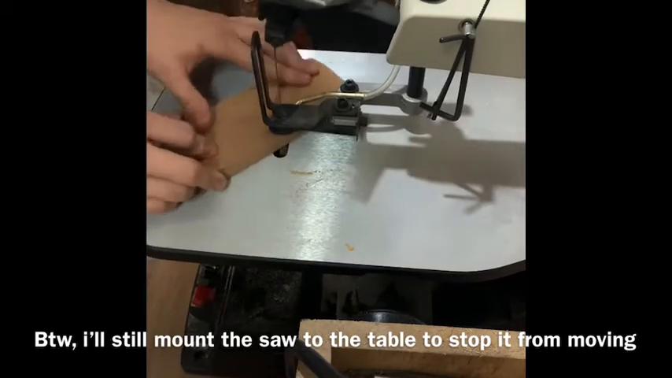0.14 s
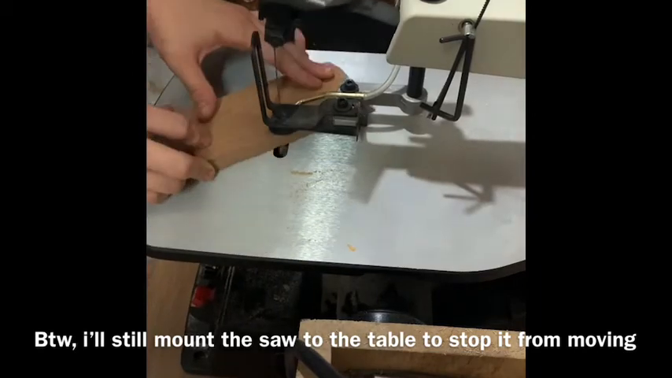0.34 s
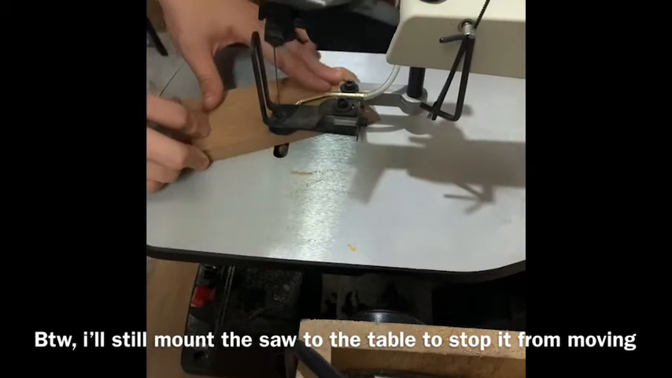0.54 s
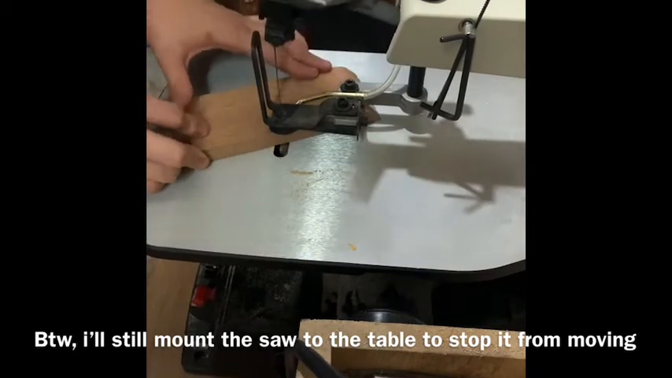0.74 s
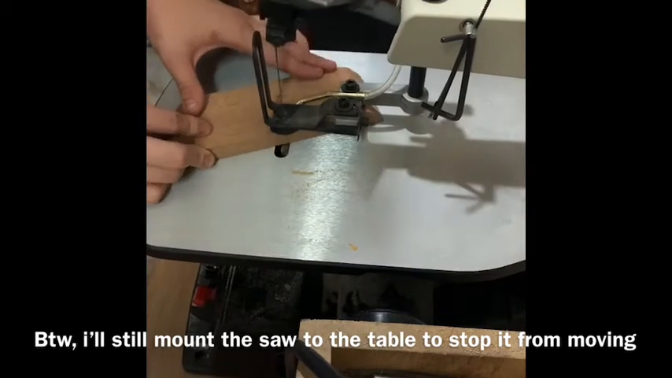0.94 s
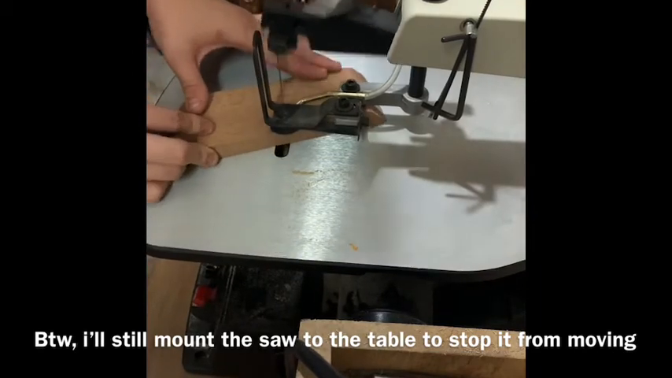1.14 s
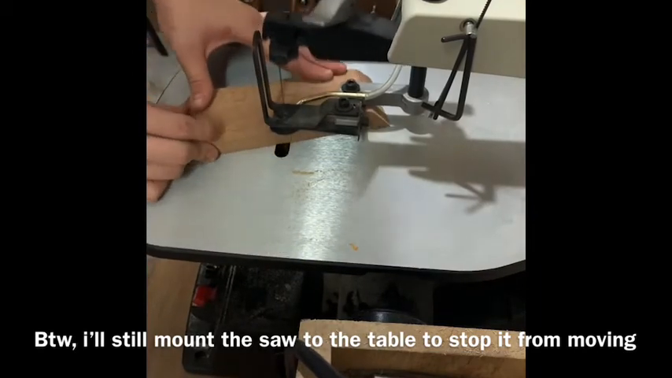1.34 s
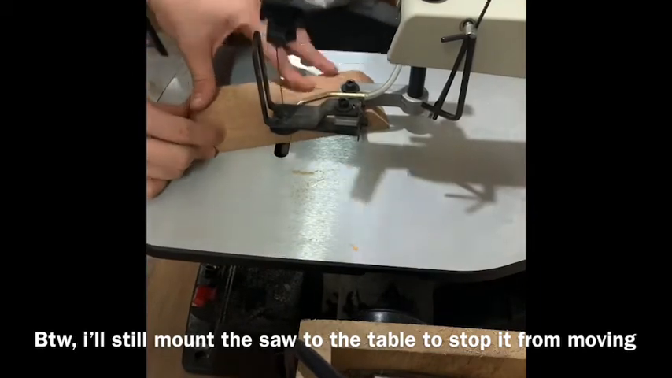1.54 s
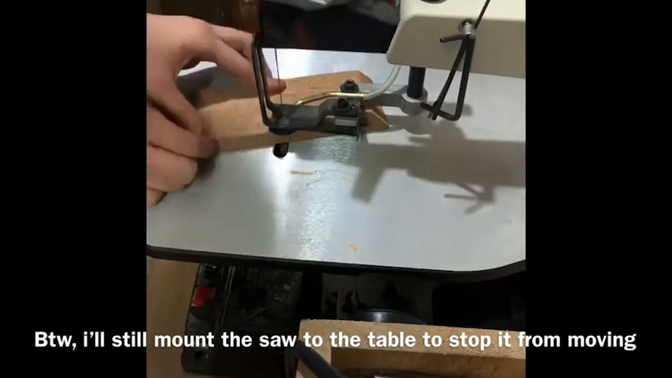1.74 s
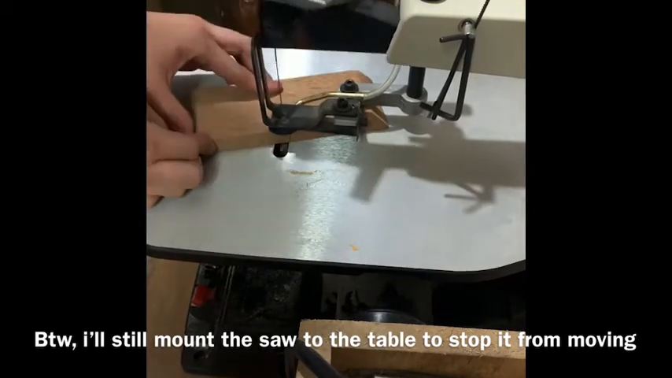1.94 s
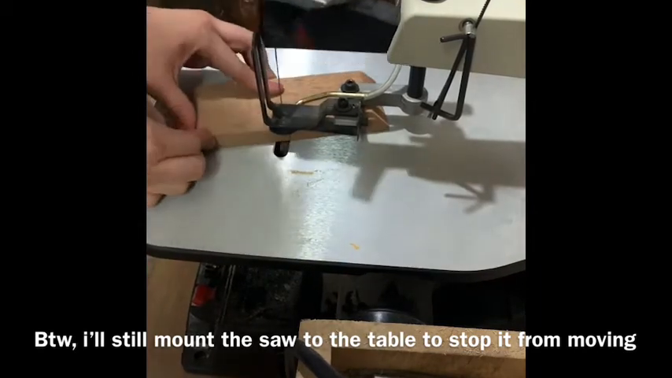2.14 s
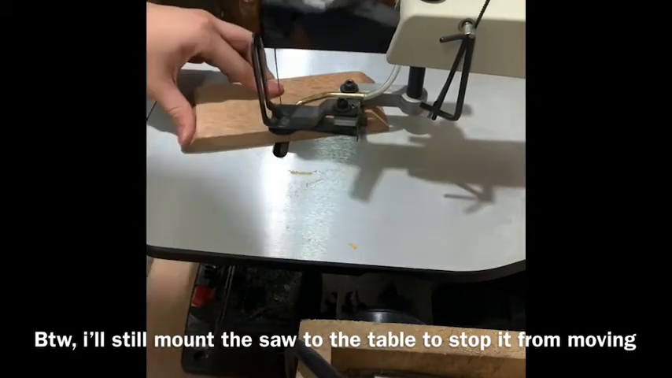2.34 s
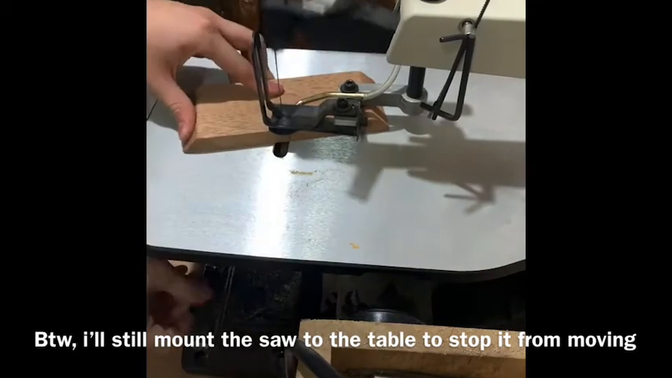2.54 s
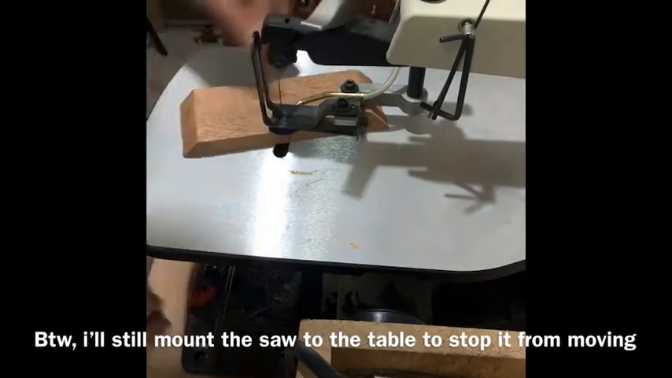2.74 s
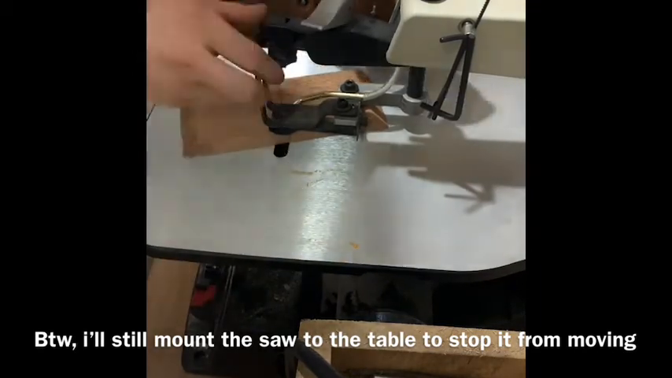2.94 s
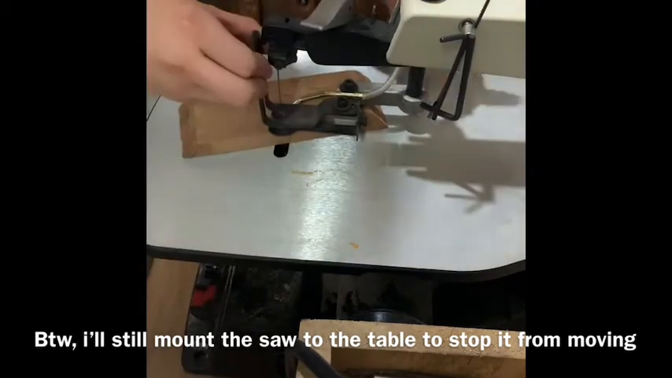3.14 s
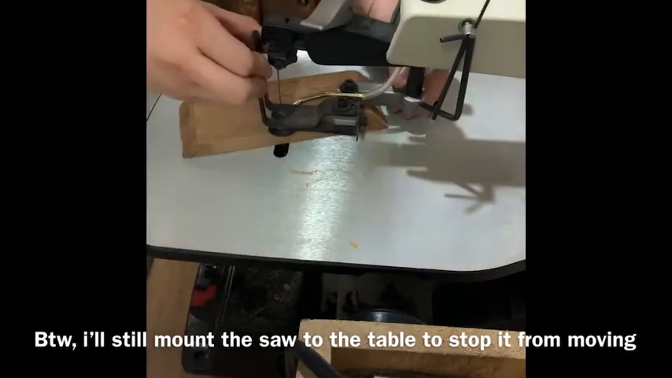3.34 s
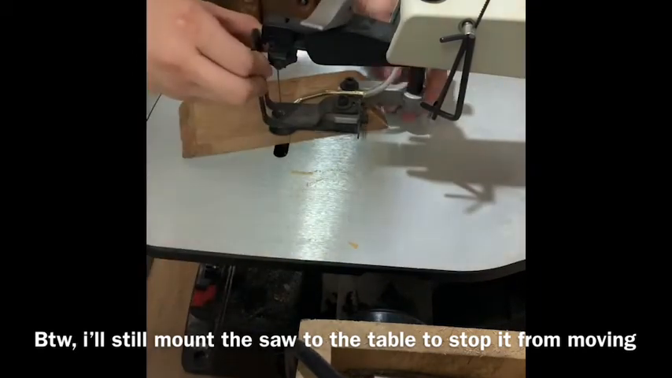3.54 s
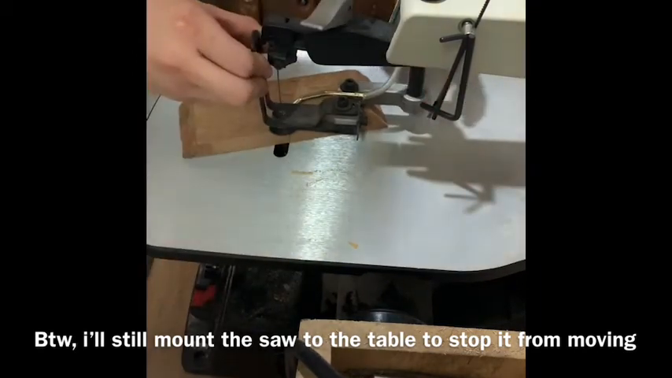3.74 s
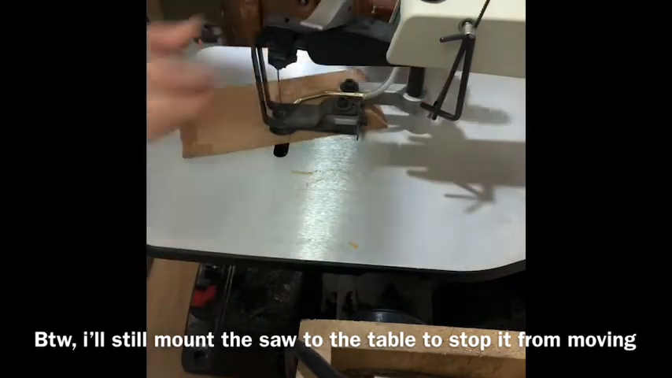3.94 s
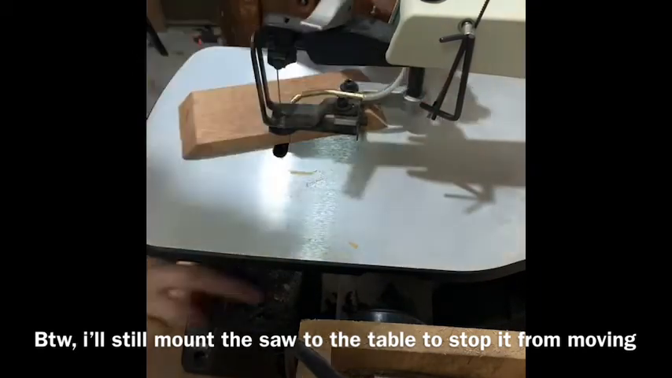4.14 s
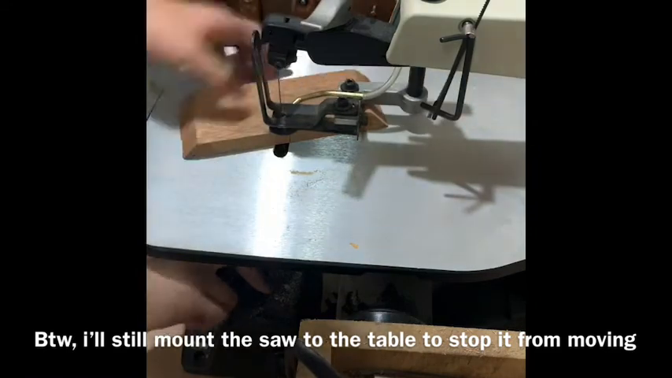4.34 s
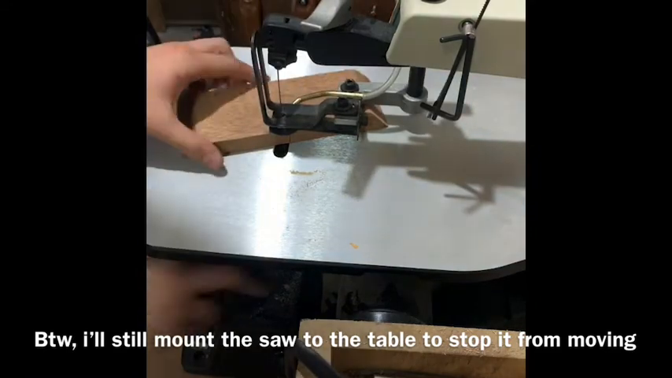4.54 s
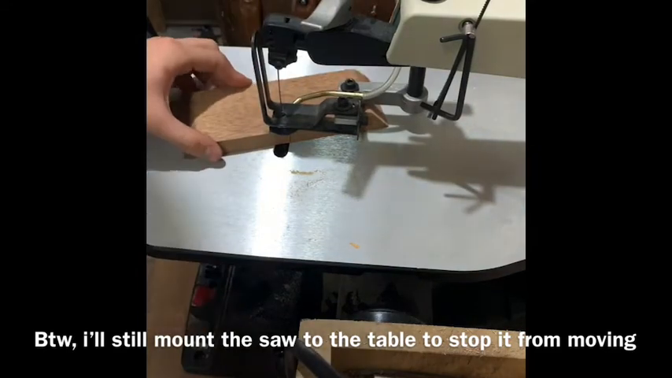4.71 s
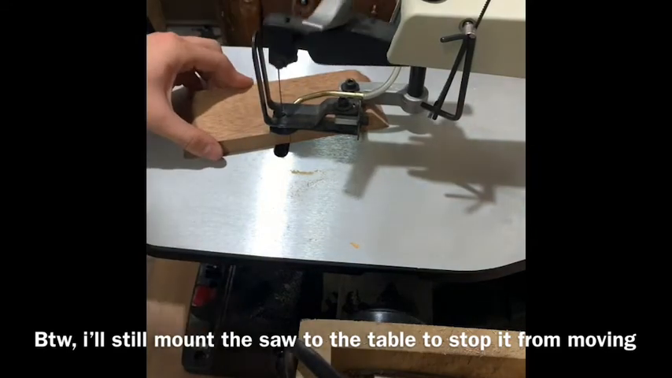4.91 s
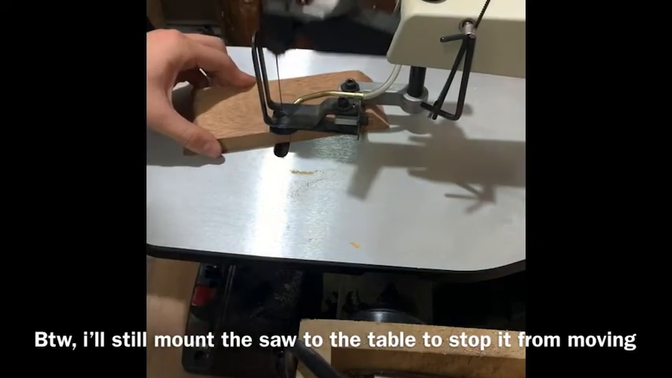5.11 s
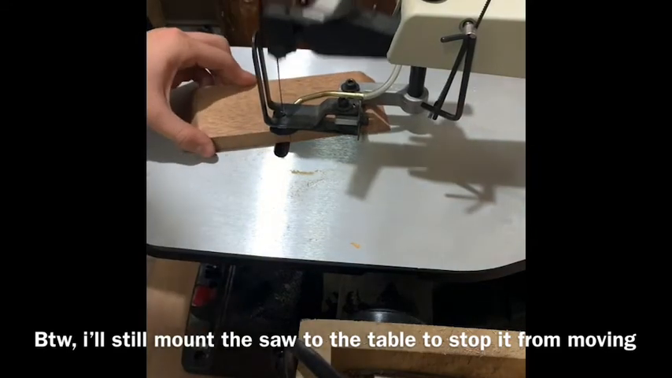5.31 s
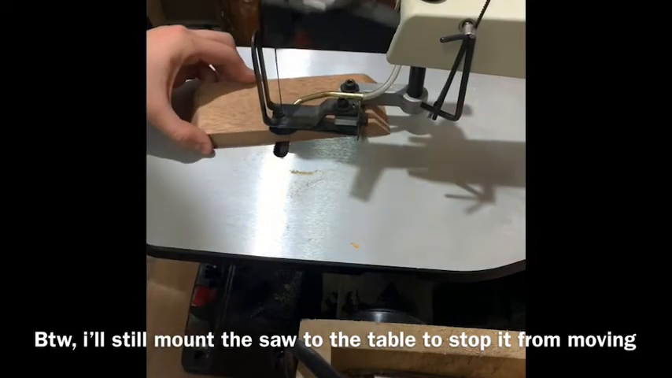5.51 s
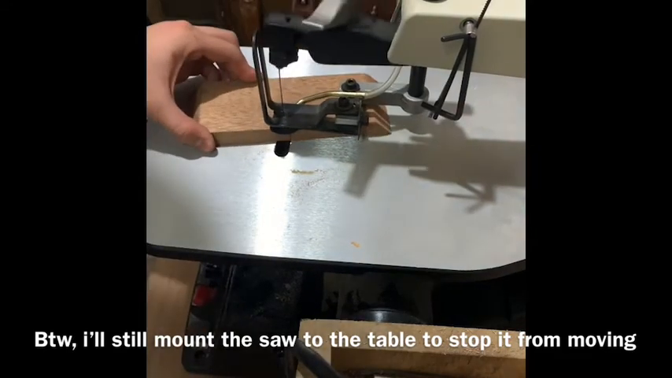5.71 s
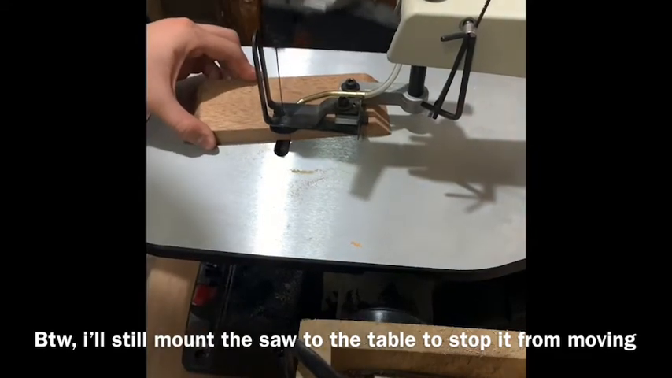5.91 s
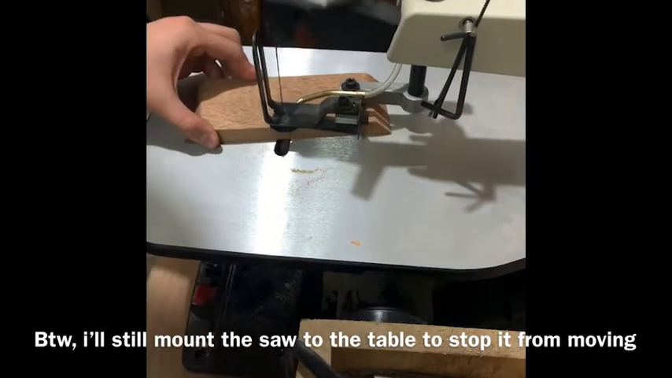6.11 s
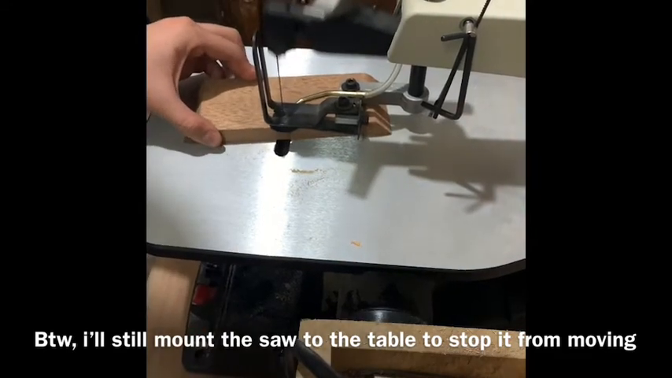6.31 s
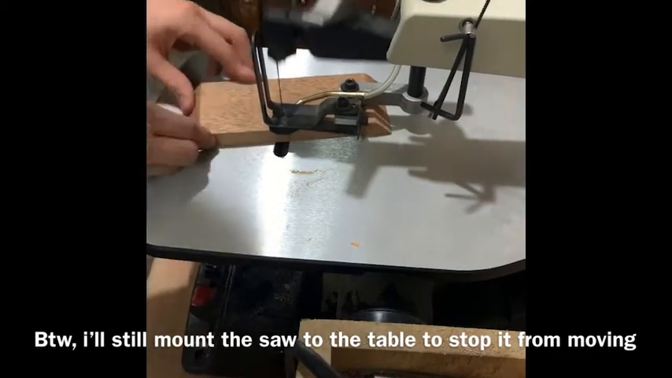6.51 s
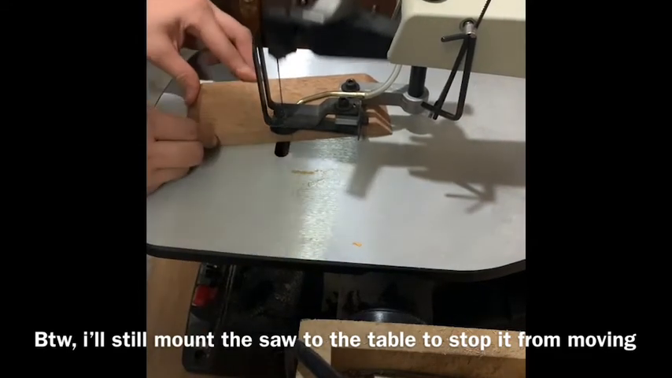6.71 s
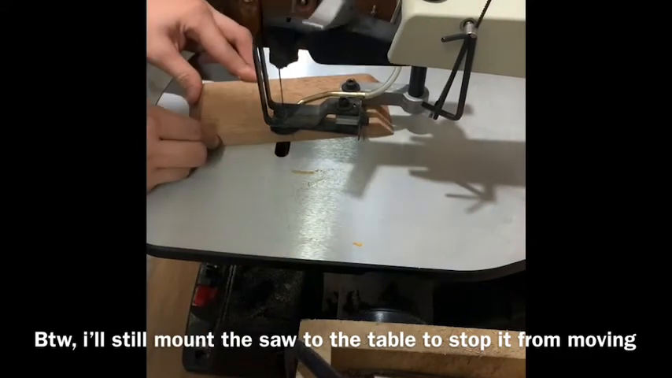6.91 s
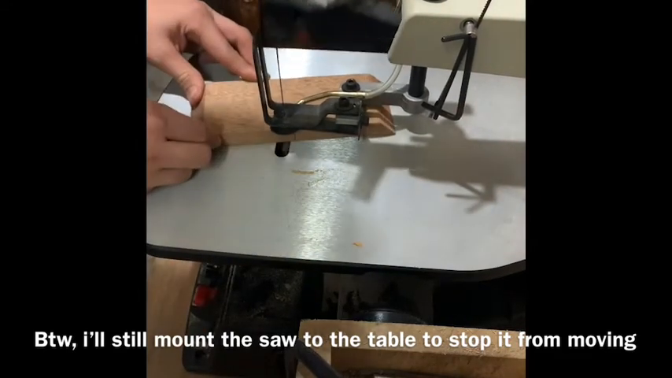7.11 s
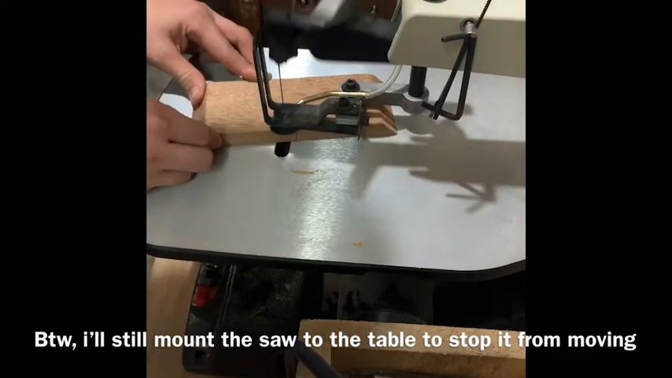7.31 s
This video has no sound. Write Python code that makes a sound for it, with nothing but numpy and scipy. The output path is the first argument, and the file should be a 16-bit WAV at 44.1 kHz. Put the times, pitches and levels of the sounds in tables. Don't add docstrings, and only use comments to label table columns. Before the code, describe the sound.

Close up in a small workshop, a scroll saw buzzes while its teeth rasp a board about thirteen times a second. It snaps off almost instantly. Over faint ventilation hum, fingers tick on a metal clamp and hands bump and drag on the table. A second switch snap, and the saw restarts, building to sharp, sizzling bites.

```python
import sys
import numpy as np
from scipy import signal
from scipy.fft import rfft, irfft, next_fast_len
from scipy.io import wavfile
from scipy.ndimage import uniform_filter1d

SR = 44100
rng = np.random.default_rng(int(sys.argv[2]) if len(sys.argv) > 2 else 0)


def invert_db(level):
    return 10 ** (np.asarray(level, dtype=float) / 20)


def digitize_waveform(pressure):
    field = np.atleast_2d(pressure).T
    bounded = np.clip(field, -1, 1)
    quanta = np.round(bounded * 32767).astype(np.int16)
    wavfile.write(sys.argv[1], SR, quanta)


N = 324576
SIZE = next_fast_len(N + SR)
HZ = np.maximum(np.arange(SIZE // 2 + 1) * SR / SIZE, 1)
T = np.arange(N) / SR
MAINS_BUZZ_HZ = 120
OFF_S, ON_S, COAST_S = 2.62, 4.732, 0.011

# frequency in Hz, level in dB per Hz
RASP_COLOUR = [(110, -42), (300, -3), (600, -13.5), (1400, -10.5), (2500, -14.5), (4000, -11),
               (6500, -20.5), (8300, -8.5), (9100, -16), (10500, -8), (11500, -27)]
# frequency in Hz, level in dB per Hz
SIZZLE_COLOUR = [(9800, -42), (10800, -0.5), (12800, -5), (14500, -7), (15300, 1), (15600, -9),
                 (15850, -28), (16300, -32)]
# time in seconds, position in turns
CRANK = [(0.0, -0.48), (0.556, 7), (0.8445, 11), (1.0527, 14), (1.4365, 19), (1.642, 22), (1.911, 26),
         (2.2523, 31), (2.6, 36.13), (4.74, 0.35), (5.022, 3), (5.262, 6), (5.5674, 10), (5.8658, 14),
         (6.2253, 19), (6.5728, 24), (6.8376, 27), (7.36, 33.68)]
# time in seconds, feed pressure in dB, long edge free in dB,
# short edge free in dB, board turned in dB
FEED = [
    [(0.0, 2.5, -20, -14, -5.5), (0.7, -1.5, -22, -24, -6), (0.85, 0, -12, -12, -4),
     (1.15, 4, -5, -3.5, -11), (1.44, 2.5, -28, -3, -2.5), (1.65, 3, -27, -4.5, 0), (1.95, 0, -29, -5, -4),
     (2.4, 4.5, -25, -12, 3), (2.6, 2.5, -25, -4, -0.5)],
    [(4.74, -11, -8, -15, -6), (4.95, -2, -18, -22, -9.5), (5.2, 3.5, -7, -10, -8.5),
     (5.65, -0.5, -1, -13, -8), (5.8, 3, -7, -20, -4.5), (6.23, 4, -12, -23, -0.5), (6.32, 1, 3.5, -18, -2),
     (6.6, 2, 4, -15, 2.5), (7.36, 4, -6, -9, 1.5)],
]


def rms_one(x):
    return x / np.sqrt(np.mean(x ** 2) + 1e-20)


def at_hz(points):
    hz, values = np.array(points).T
    return np.interp(np.log(HZ), np.log(hz), values)


def in_time(spans):
    s, *columns = np.transpose(np.vstack(spans))
    return [np.interp(T, s, c) for c in columns]


def shaped(x, response):
    return irfft(rfft(x, SIZE) * response, SIZE)[..., :N]


def butter(x, order, hz, kind="low"):
    return signal.sosfilt(signal.butter(order, hz, kind, fs=SR, output="sos"), x)


def drift(per_s):
    return rms_one(shaped(rng.standard_normal(N), 1 / (1 + (HZ / per_s) ** 2)))


def resonances(x, modes, patchy_db=0):
    out, power = 0, 0
    for k, (hz, width_hz, db) in enumerate(modes):
        r = np.exp(-np.pi * width_hz / SR)
        a = [1, -2 * r * np.cos(2 * np.pi * hz / SR), r * r]
        b = [(1 - r * r) / 2, 0, (r * r - 1) / 2]
        fed = x * invert_db(patchy_db * drift(38)) if patchy_db else x
        out = out + (-1) ** k * invert_db(db) * signal.lfilter(b, a, fed + 1e-18)
        power += invert_db(2 * db) * np.pi * width_hz / SR
    return out / np.sqrt(power)


def grains(per_s, spread_db):
    sizes = invert_db(spread_db * np.minimum(rng.exponential(1, N), 5)) * rng.choice([-1, 1], N)
    return rms_one(sizes * (rng.random(N) < per_s / SR))


def bursts(times, levels_db, hold_ms, rise_ms, fall_ms):
    out = np.zeros(N + SR)
    t_ms = np.arange(SR // 8) / SR * 1000
    for s, db, hold in np.broadcast(times, levels_db, hold_ms):
        rise = 1 - np.exp(-t_ms / rise_ms)
        fall = np.exp(-0.4 * t_ms / max(hold, 0.1) - np.maximum(t_ms - hold, 0) / fall_ms)
        out[round(s * SR):][:len(t_ms)] += invert_db(db) * rise * fall
    return out[:N]


def workshop_hum():
    # frequency in Hz, level in dB per Hz
    common_colour = [(15, -55), (40, -29), (74, -13.5), (128, -10), (145, 1), (165, -6.5), (294, -11),
                     (346, -4.5), (396, -14), (491, -8.5), (718, -9), (2490, -23.5), (8670, -36),
                     (9400, -42), (10800, -34.5), (15300, -40), (15900, -60)]
    # frequency in Hz, level in dB per Hz
    apart_colour = [(15, -45), (170, -26), (310, -17), (336, -16), (385, -10), (505, -15), (941, -8.5),
                    (1340, -6.5), (10800, -26.5), (13000, -34), (16200, -41)]
    # frequency in Hz, level in dB
    whine_tones = [(1136, -49.5), (1227, -48.5), (1502, -54), (1911, -52.5), (2455, -53.5)]
    notch = 1 - 1.2 / (1 + ((HZ - 1370) / 55) ** 2)
    swell_db = 0.4 * drift(3)
    common = rms_one(shaped(rng.standard_normal(N), notch * invert_db(at_hz(common_colour))))
    apart = rms_one(shaped(rng.standard_normal(N), invert_db(at_hz(apart_colour))))
    whines = sum(invert_db(db - 5.5) * np.sin(2 * np.pi * hz * T) for hz, db in whine_tones)
    return invert_db(-39 + swell_db) * common + whines + invert_db(-44.5) * apart * [[1], [-1]]


def room(x, wet_db):
    # frequency in Hz, T60 in seconds
    decay = [(100, 1), (1000, 0.19), (4000, 0.12), (12000, 0.28)]
    sides = np.zeros((2, len(HZ)), complex)
    for k, lag_s in enumerate(rng.uniform(0.012, 0.04, 16)):
        loop = invert_db(-60 * lag_s / at_hz(decay)) * np.exp(-2j * np.pi * HZ * lag_s)
        sides[k % 2] += loop / (1 - loop) * (-1) ** (k // 2)
    apart = 1 / (1 + (600 / HZ) ** 3)
    dull = 1 / (1 + (HZ / 7500) ** 6)
    return invert_db(wet_db) * shaped(x, dull * (apart * sides + (1 - apart) * sides.mean(axis=0)))


def ports(x):
    # frequency in Hz, phase in radians
    lead = [(0, 0), (700, .25), (1120, -.65), (1810, 1.6), (2070, 6.1), (3530, 6.3), (4310, 7.7),
            (4570, 7.2), (5860, 8.4), (6550, 7.4), (7670, 8.6), (8200, 8.95), (8700, 9.2), (9250, 9.42),
            (10300, 9.45), (12500, 12.1), (15800, 13.3)]
    # frequency in Hz, level in dB
    left_level = [(60, -.5), (250, -1.2), (1000, -2.5), (2000, -.6), (4000, -.7), (8000, 0), (16000, 0)]
    half = invert_db(at_hz(left_level) / 2) * np.exp(0.5j * np.interp(HZ, *np.transpose(lead)))
    return shaped(x, np.array([half, 1 / half]))


def scatter(x, side_db):
    t = np.arange(SR // 10) / SR
    bounces = rng.standard_normal(SR // 10) * np.exp(-t / 0.012)
    colour = 1 / (1 + (800 / HZ) ** 6) / (1 + (HZ / 7000) ** 8)
    colour = colour + 0.56 / (1 + (11000 / HZ) ** 16)
    response = rfft(bounces / np.sqrt(np.sum(bounces ** 2)), SIZE) * colour
    return invert_db(side_db) * ports(shaped(x, response)) * [[1], [-1]]


def fingers():
    # time in seconds, peak in dB, body against the peak in dB
    ticks = [(2.6697, -30, 8), (2.9574, -19, -13), (2.9916, -27, -14), (3.0294, -39, -7), (3.1544, -35, -4),
             (3.3912, -39.5, 19), (3.458, -31.5, 14.5), (3.9844, -27, -13), (4.155, -18, -18),
             (4.1806, -31, 12.5), (4.329, -29.5, 10)]
    at, db, body_db = np.transpose(ticks)
    white = rng.standard_normal(N)
    bright = rms_one(butter(white, 2, 6000, "high"))
    body = rms_one(butter(white, 2, [2200, 5000], "band"))
    tick = bursts(at, db - 12.5, 8.5, rise_ms=0.25, fall_ms=28.0) * bright
    return tick + bursts(at, db + body_db - 20.0, 4.3, rise_ms=0.3, fall_ms=7.6) * body


def switch():
    # time in seconds, peak in dB, top against the peak in dB, ring share 0-1, middle modes in dB
    snaps = [
        (2.5808, -8, -8, 0.42, 4.5),
        (4.3955, -11.5, -14, 0.37, -1),
    ]
    # frequency in Hz, level in dB, T60 in seconds
    plastic = [(810, 6.5, 0.035), (1044, 1.5, 0.034), (1184, 3, 0.04), (1400, -21.5, 0.024),
               (2410, -6.5, 0.035), (3000, 1, 0.017), (3600, -5.5, 0.028), (4250, 6.5, 0.012),
               (5050, -15, 0.015)]
    out, white = np.zeros(N), rng.standard_normal(N)
    at, db, top_db, ring, middle_db = np.transpose(snaps)
    for hz, level_db, t60 in plastic:
        clicks = np.zeros(N)
        for late_s, share in [(0.0033, 1.1), (0.007, 0.28), (0.012, -0.6), (0.019, 0.42)]:
            share *= min(1, 1300 / hz) ** (late_s / 0.011)
            click_db = db + level_db - 3 + (2000 < hz < 3800) * middle_db + rng.normal(0, 1.5, len(at))
            clicks[((at + late_s) * SR).astype(int)] = share * ring * invert_db(click_db)
        r, w = invert_db(-60 / (t60 * SR)), 2 * np.pi * hz / SR
        out += signal.lfilter([0, np.sin(w)], [1, -2 * r * np.cos(w), r * r], clicks + 1e-18)
    out = butter(out, 2, 500, "high")
    scrape = rms_one(shaped(white, invert_db(at_hz(RASP_COLOUR))))
    top = rms_one(shaped(white, invert_db(at_hz(SIZZLE_COLOUR))))
    out += bursts(at, db - 5.5, 4.2, rise_ms=1.0, fall_ms=2.6) * scrape
    return out + bursts(at, db + top_db + 1.0, 1.9, rise_ms=0.4, fall_ms=8.7) * top


def hands(bright_share):
    # start in seconds, length in seconds, level in dB, brightness in dB
    touches = [
        (2.937, 0.025, -42, -17),
        (3.117, 0.035, -41.5, 3),
        (3.353, 0.17, -35.5, -11),
        (4.386, 0.019, -45, 31),
    ]
    out = 0
    for s, length_s, db, bright_db in touches:
        rise = np.clip((T - s) / 0.0045, 0, 1)
        fall = np.exp(-np.maximum(T - s - length_s, 0) / 0.0042)
        out = out + invert_db(db + bright_share * bright_db) * rise * fall
    return out


def power_on(coast_s):
    return np.exp(-np.maximum(T - OFF_S, 0) / coast_s) + np.clip((T - ON_S) / 0.002, 0, 1)


def crank_turns():
    return np.interp(T, *np.transpose(CRANK))


def strokes(turn):
    spells = [np.transpose(rows) for rows in np.split(np.array(CRANK), 2)]
    return np.concatenate([np.interp(np.arange(turn, turns[-1]), turns, s) for s, turns in spells])


def stand():
    turns = crank_turns()
    per_s = uniform_filter1d(np.gradient(turns) * SR, size=SR // 5)
    level_db = -45.5 + 7 * np.clip(per_s - 13.5, -3, 3) + 0.7 * drift(5.0)
    return power_on(COAST_S) * invert_db(level_db) * np.sin(2 * np.pi * (2 * MAINS_BUZZ_HZ * T - turns))


def hum_tones(table, lag, wobble_db, swing):
    # time in seconds, level in dB
    strain = [
        [(0.0, -23), (0.54, -44), (1.2, -34), (1.23, -23), (1.31, -41), (1.33, -24.5), (1.76, -26.5),
         (2.28, -22), (2.57, -31.5)],
        [(4.76, -28), (4.82, -59), (5.63, -19.5), (6.76, -31), (6.82, -23), (6.86, -43), (6.87, -22.5),
         (7.33, -27.5), (7.36, -34)],
    ]
    turns = crank_turns() - lag
    strain_db = in_time(strain)[0] + 31
    damped_db = np.clip(9 + in_time(FEED)[1], 0, 6) * (T > 6.3)
    start, out = rng.uniform(0, 2 * np.pi, 20), 0
    for hum, crank, db in table:
        phase = 2 * np.pi * (hum * MAINS_BUZZ_HZ * T + crank * turns) + start[hum]
        phase += swing * np.pi / 2 * crank ** 2
        level_db = db + (crank < -1) * strain_db - (hum == 10) * damped_db + wobble_db * drift(3.9)
        out = out + invert_db(level_db) * np.sin(phase)
    return out


def motor_levels():
    # time in seconds, level in dB
    load = [
        [(0.0, -24), (0.6, -25.5), (0.9, -23), (1.25, -20), (1.44, -19), (1.73, -23.5), (2.1, -23),
         (2.3, -21.5), (2.6, -21)],
        [(4.74, -23), (5.45, -20), (5.64, -19), (5.78, -25), (5.9, -19.5), (6.2, -23), (6.7, -21.5), (6.9, -17),
         (7.36, -19.5)],
    ]
    load_db = in_time(load)[0] + 22
    running = power_on(COAST_S)
    inrush_db = 4 * (T > ON_S) * np.exp(-np.abs(T - ON_S) / 0.04)
    return load_db, running * invert_db(-22 + load_db), running * invert_db(-29 + 0.66 * load_db + inrush_db)


def frame_boom(load_db, boom_gain):
    # time in seconds, peak in dB
    thumps = [(0.029, 2), (0.18, -4), (0.828, -9), (0.909, -3), (1.075, 7), (1.145, -2), (1.47, -6),
              (2.35, -16), (5.884, 6), (6.4, -2), (6.799, 8), (6.875, 0), (7.145, 1), (7.218, -1),
              (1.225, 6.5), (1.312, 5), (1.387, 7.5), (2.077, 0), (2.131, -27), (2.232, -13), (5.233, -13),
              (5.567, -17), (5.961, -4), (6.147, 2), (6.276, -10), (6.524, 8), (6.964, 8.5), (7.077, -6),
              (7.303, 8.5)]
    # frequency in Hz, width in Hz, level in dB
    frame_modes = [(147, 1.7, -23.5), (228.4, 52, -19), (289.5, 5, -18), (300.1, 5.8, 5), (342, 7.9, 5),
                   (372.7, 1.9, 2), (413, 114, -10.5), (261.7, 30.6, -12)]
    turn_s = strokes(turn=0.42)
    turn_db = -7 + load_db[(turn_s * SR).astype(int)] + 4 * rng.standard_normal(len(turn_s))
    thump_s, thump_db = np.hstack([np.transpose(thumps), [turn_s, turn_db]])
    shaking = invert_db(-15) * boom_gain + invert_db(-47) + hands(0)
    blows = bursts(thump_s, thump_db - 17.5, 9.55, rise_ms=3.6, fall_ms=5.0)
    drive = (shaking + blows) * grains(2500, spread_db=3.5)
    return butter(resonances(drive, frame_modes), 2, 520)


def table_plate(chatter):
    # time in seconds, peak in dB
    knocks = [(0.009, -15), (0.249, -24), (0.534, -26), (0.599, -26), (0.703, -17), (0.871, -13.5),
              (0.937, -23), (1.055, -20), (1.129, -9.5), (1.234, -14), (1.286, -18), (1.374, -21),
              (1.436, -21), (1.524, -21), (1.673, -16), (1.746, -33), (2.188, -22), (2.313, -17),
              (2.387, -16), (2.456, -20), (4.737, -40), (4.814, -31), (5.022, -14.5), (5.115, -21),
              (5.184, -17), (5.296, -19), (5.375, -14.5), (5.444, -18), (5.655, -25), (5.714, -17),
              (5.868, -12.5), (5.943, -10.5), (6.017, -25), (6.087, -18), (6.153, -14), (6.227, -17),
              (6.373, -8.5), (6.844, -10.5), (6.915, -17), (6.994, -18), (7.069, -15), (7.224, -15),
              (7.307, -14)]
    # frequency in Hz, width in Hz, level in dB
    plate_modes = [(733, 88, -9), (803, 28, -4), (874, 15, 2), (954, 41, 2.5)]
    at, db = np.transpose(knocks)
    return resonances(bursts(at, db - 5.5, 14.7, rise_ms=1.0, fall_ms=4.6) * chatter, plate_modes)


def housing_buzz(at, buzz_gain, chatter):
    # frequency in Hz, width in Hz, level in dB
    housing_modes = [(625, 47, -22), (746, 47, -11.5), (795, 13, -0.5), (819.5, 42.6, 0), (921, 106, 1),
                     (944, 33, 1), (1053, 3.5, 2), (1093, 78, -5), (1257, 38, -12), (1160, 130, -23)]
    running = power_on(COAST_S)
    poles = 1 + 2.0 * running * np.cos(2 * np.pi * MAINS_BUZZ_HZ * T)
    bite_load = 1 + bursts(at, -11.5, 37.0, rise_ms=4.1, fall_ms=14.0)
    rattle = invert_db(-6) * buzz_gain + invert_db(-54.5) + hands(0.26)
    buzz = resonances(rattle * poles * bite_load * chatter, housing_modes)
    return buzz * invert_db(3.0 * running * np.cos(2 * np.pi * (crank_turns() - 0.38)))


def motor_tones(boom_gain, buzz_gain):
    # multiple of the hum, multiple of the stroke rate, level in dB
    frame_tones = [(1, 2, -25), (2, -1, -30), (2, 0, -18), (2, 1, -21), (2, 2, -17), (2, 3, -22),
                   (3, -4, -14), (3, -3, -10), (3, -2, -9), (3, -1, 0), (3, 0, -5.5), (3, 1, -12),
                   (4, -3, -27), (4, -1, -25), (4, 0, -20), (4, 1, -23)]
    # multiple of the hum, multiple of the stroke rate, level in dB
    housing_tones = [(5, 0, -13), (5, 1, -11), (6, 0, -15), (7, -1, 0), (7, 0, -10), (7, 1, -3),
                     (8, -4, -10), (8, -1, -7), (9, -2, -16), (9, -1, -6), (9, 0, -5), (9, 1, -3),
                     (10, -1, -5), (10, 0, -6), (10, 1, -9), (12, -1, -21), (12, 1, -21), (15, -1, -20),
                     (16, -1, -16), (16, 0, -21)]
    tones = invert_db(-2) * boom_gain * hum_tones(frame_tones, lag=-0.21, wobble_db=1.2, swing=0.859)
    tones += invert_db(-4.5) * buzz_gain * hum_tones(housing_tones, lag=0.52, wobble_db=1.5, swing=0.35)
    return tones * invert_db(1.5 * np.cos(2 * np.pi * (crank_turns() - 0.69)))


def motor(at):
    load_db, boom_gain, buzz_gain = motor_levels()
    chatter = grains(3000, spread_db=3.0)
    shaking = frame_boom(load_db, boom_gain) + table_plate(chatter) + housing_buzz(at, buzz_gain, chatter)
    return shaking, motor_tones(boom_gain, buzz_gain)


def bites():
    # time in seconds, peak in dB,
    # sizzle in dB
    first_spell = [(0.039, -24, -38), (0.0737, -37, -42), (0.1092, -22, -38), (0.171, -29, -39),
                   (0.2104, -38, -42), (0.246, -23, -42), (0.306, -31, -52), (0.3581, -37, -48),
                   (0.4214, -45, -52), (0.4813, -38, -54), (0.5566, -28, -53), (0.8175, -43, -52),
                   (0.844, -20.5, -35), (0.913, -23, -40), (0.9492, -41, -50), (0.981, -26, -42),
                   (1.0266, -41, -49), (1.056, -17, -33), (1.0934, -45, -53), (1.126, -20, -37),
                   (1.179, -27, -53), (1.2105, -16.5, -39), (1.2486, -30, -50), (1.285, -15.5, -34),
                   (1.3269, -33, -53), (1.3584, -14, -32), (1.4007, -22, -48), (1.4346, -14, -35),
                   (1.482, -19, -48), (1.5055, -16.5, -41), (1.546, -20, -45), (1.5763, -15.5, -42),
                   (1.617, -24, -50), (1.6436, -16, -33), (1.6796, -19, -40), (1.709, -20.5, -36),
                   (1.75, -21, -44), (1.7764, -18.5, -35), (1.819, -24, -40), (1.8457, -19, -37),
                   (1.8841, -25, -41), (1.91, -16, -35), (1.944, -22, -41), (1.976, -21, -39),
                   (2.0153, -23, -43), (2.0418, -26, -39), (2.0822, -29, -43), (2.1116, -22, -43),
                   (2.15, -21, -41), (2.182, -18.5, -36), (2.221, -21, -42), (2.253, -23, -38),
                   (2.2862, -30, -42), (2.3176, -23, -38), (2.3625, -25, -38), (2.427, -25, -41),
                   (2.457, -20, -31), (2.4947, -21, -39), (2.5226, -19, -37), (2.5802, -24, -21)]
    # time in seconds, peak in dB, sizzle in dB
    second_spell = [(4.8257, -36, -49), (4.8791, -28, -48), (4.9145, -40, -42), (4.9764, -21, -44),
                    (5.0238, -24, -41), (5.0602, -27, -49), (5.101, -24, -41), (5.144, -21, -50),
                    (5.182, -23, -43), (5.219, -21, -47), (5.2614, -18, -47), (5.302, -21, -50),
                    (5.334, -21, -43), (5.382, -23, -51), (5.4114, -24, -43), (5.488, -23, -40),
                    (5.5292, -26, -45), (5.5686, -18.5, -38), (5.608, -16.5, -51), (5.646, -18.5, -40),
                    (5.684, -28, -56), (5.7147, -17.5, -26), (5.7611, -26, -40), (5.79, -13.5, -23),
                    (5.837, -24, -39), (5.8663, -11, -21), (5.938, -13.5, -20), (6.01, -13, -23),
                    (6.0505, -26, -29), (6.08, -11, -19.5), (6.153, -9, -19), (6.1966, -31, -45),
                    (6.225, -4, -16.5), (6.2965, -17.5, -28), (6.3324, -24, -42), (6.3616, -16.5, -35),
                    (6.43, -18.5, -28), (6.468, -30, -40), (6.5004, -21, -37), (6.5394, -29, -44),
                    (6.5698, -26, -42), (6.598, -31, -45), (6.634, -26, -34), (6.67, -17, -44),
                    (6.6985, -31, -37), (6.7304, -17, -44), (6.7633, -20, -30), (6.8332, -18, -31),
                    (6.8796, -30, -42), (6.912, -19, -26), (6.9519, -26, -42), (6.994, -15, -25),
                    (7.0427, -27, -39), (7.0763, -16, -25), (7.121, -33, -37), (7.149, -17, -27),
                    (7.1929, -33, -34), (7.2263, -17.5, -28), (7.2747, -33, -34), (7.303, -13.5, -26)]
    return np.transpose(first_spell + second_spell)


def board_ring(at, db, running, idle):
    # frequency in Hz, width in Hz, level in dB
    low_modes = [(1207, 93, 3.5), (1535, 29, 6.5), (1778, 43, 6.5), (1910, 66, 7.5), (2115, 46, 10.5),
                 (1386, 140, -4.5), (2287, 21, -7), (2543, 8.7, -4)]
    # frequency in Hz, width in Hz, level in dB
    high_modes = [(2770, 63, 6), (3148, 39, 8.5), (3360, 36, 9), (3630, 71, 0.5)]
    # frequency in Hz, width in Hz, level in dB
    long_edge = [(3000, 42, 0)]
    # frequency in Hz, width in Hz, level in dB
    short_edge = [(2320, 22, -0.95), (2550, 32, -1.1)]
    feed_db, long_db, short_db, turned_db = in_time(FEED)
    board_db = -37 + 0.85 * feed_db
    blows = bursts(at, 1.0 + 0.43 * (db + 17.5), hold_ms=14, rise_ms=2, fall_ms=5)
    shake = (0.45 + blows) * grains(4000, spread_db=1.5)
    low = (running * invert_db(board_db - turned_db - 3.5) + invert_db(11) * idle) * shake
    high = (running * invert_db(board_db + turned_db - 6.0) + invert_db(7) * idle) * shake
    board = resonances(low, low_modes, patchy_db=3.5) + resonances(high, high_modes, patchy_db=3.0)
    for edge, free_db in (long_edge, long_db), (short_edge, short_db):
        board += resonances(running * invert_db(board_db + free_db) * shake, edge)
    return np.interp(T + 0.0004 * drift(4), T, board)


def teeth_rasp(at, db, running, idle):
    # frequency in Hz, width in Hz, level in dB
    arm_modes = [(4530, 110, 4), (5290, 65, 0), (5660, 70, 4), (6210, 200, -1), (6560, 190, -2),
                 (7010, 44, -1), (8440, 71, -3)]
    contacts = grains(5000, spread_db=1.0)
    bite = bursts(at, db - 10.0, 13.4, rise_ms=0.13, fall_ms=2.9) * contacts
    bite = butter(bite, 1, 3000, "high")
    steady = running * invert_db(-39 + in_time(FEED)[0]) + idle
    teeth = steady * invert_db(2.46 * drift(28)) * contacts + bite
    arm = resonances(teeth + 0.086 * bite, arm_modes, patchy_db=4.5)
    arm = np.interp(T + 0.00038 * drift(3.2), T, arm)
    return invert_db(15.0) * shaped(teeth, invert_db(at_hz(RASP_COLOUR))) + invert_db(-10.0) * arm


def blade_sizzle(at, sizzle_db, running, idle):
    # frequency in Hz, width in Hz, level in dB
    blade_modes = [(11600, 72, -2), (12100, 87, -1), (12740, 180, 2), (13440, 37, 0), (14500, 390, 1)]
    hiss = running * invert_db(-48.5 + 0.64 * in_time(FEED)[0]) + invert_db(-4) * idle
    hiss = hiss * invert_db(2.5 * drift(25))
    catches = bursts(at, sizzle_db + 1.0, 12.0, rise_ms=0.9, fall_ms=17.0)
    tips = (hiss + catches) * grains(11000, spread_db=2.5)
    sizzle = invert_db(3.5) * shaped(tips, invert_db(at_hz(SIZZLE_COLOUR)))
    return sizzle + invert_db(-14.0) * resonances(tips, blade_modes, patchy_db=6.0)


def cut(at, db, sizzle_db):
    running = power_on(2.0 * COAST_S)
    idle = invert_db(-60.5) + invert_db(-24) * hands(0.9)
    sound = board_ring(at, db, running, idle) + teeth_rasp(at, db, running, idle)
    return sound + blade_sizzle(at, sizzle_db, running, idle)


def scene():
    at, db, sizzle_db = bites()
    shaking, tones = motor(at)
    near = shaking + cut(at, db, sizzle_db) + switch() + fingers() + stand()
    near = butter(near, 2, 70, "high")
    return ports(near + tones) + room(near, wet_db=-10.0) + workshop_hum() + scatter(near, side_db=-5.0)


def low_pass(x):
    return signal.sosfilt(signal.butter(12, 16310, fs=SR, output="sos"), x)


def record(dry):
    rounded = 0.85 * np.tanh(dry / 0.85)
    mix = signal.sosfilt(signal.cheby2(10, 60, 16200, fs=SR, output="sos"), rounded)
    return low_pass(mix)


dry = scene()
out = record(dry)
digitize_waveform(out)
```